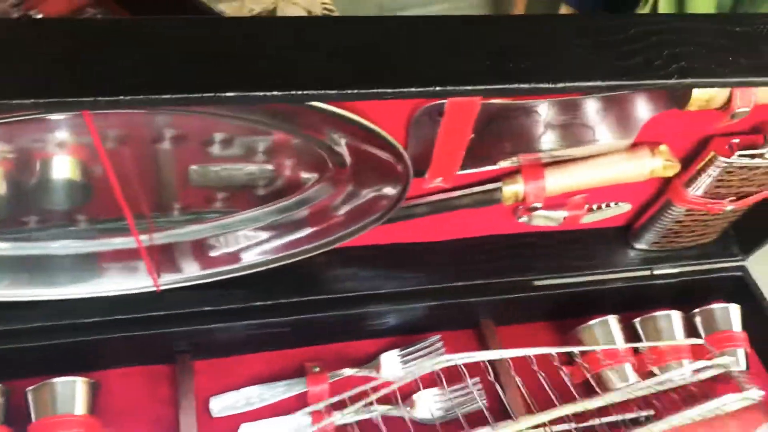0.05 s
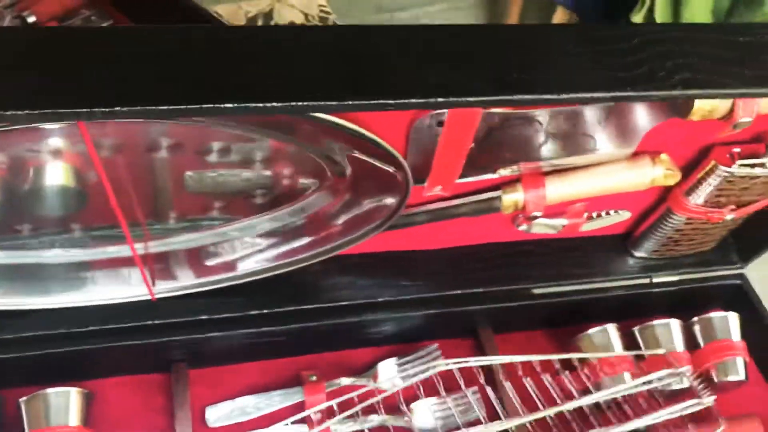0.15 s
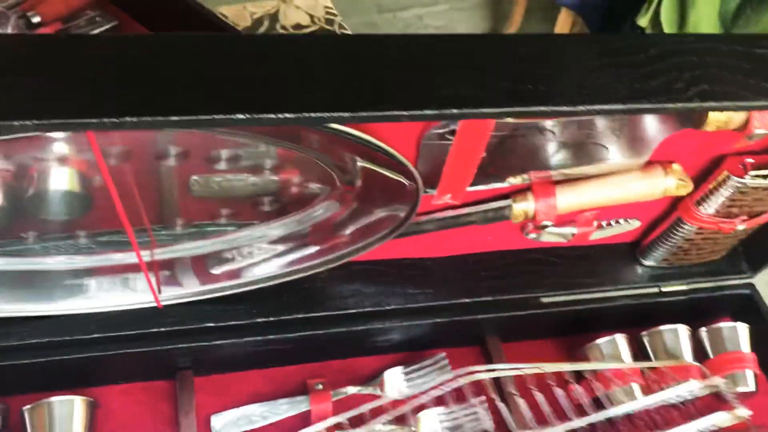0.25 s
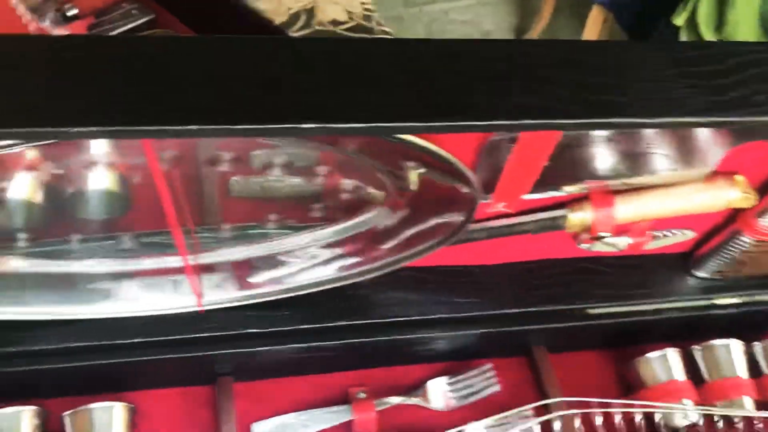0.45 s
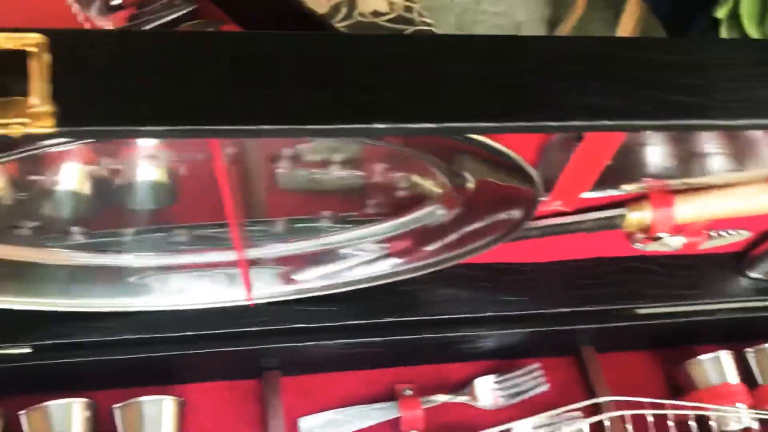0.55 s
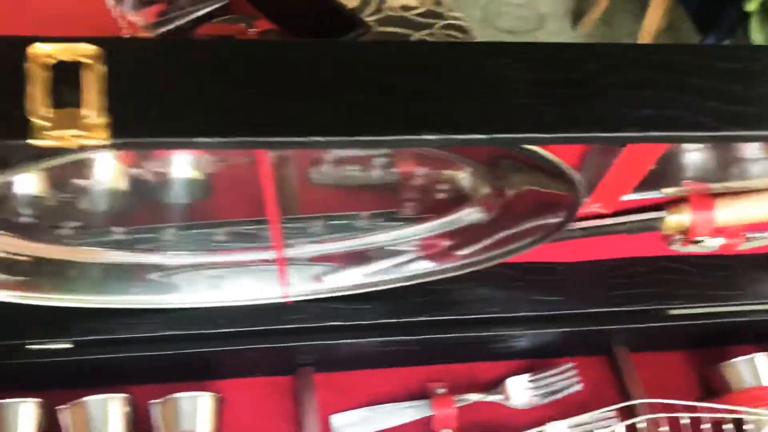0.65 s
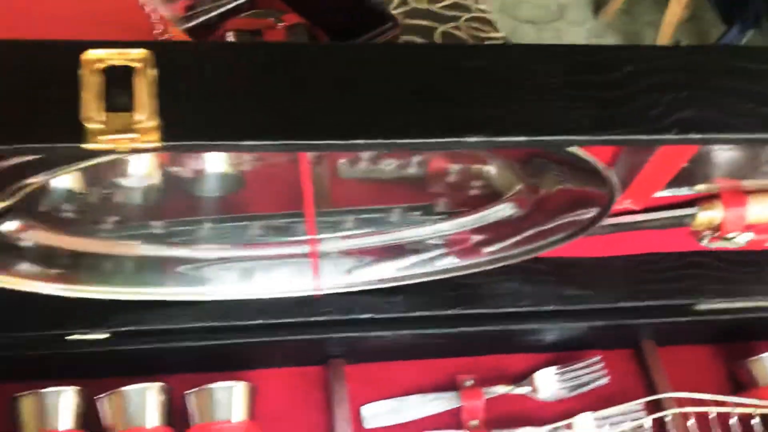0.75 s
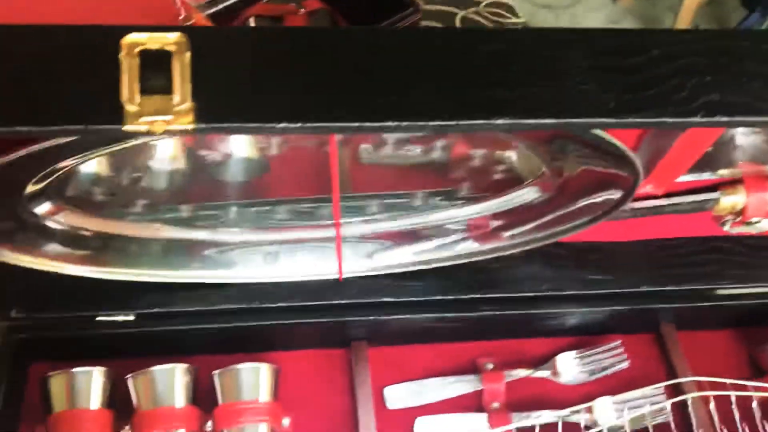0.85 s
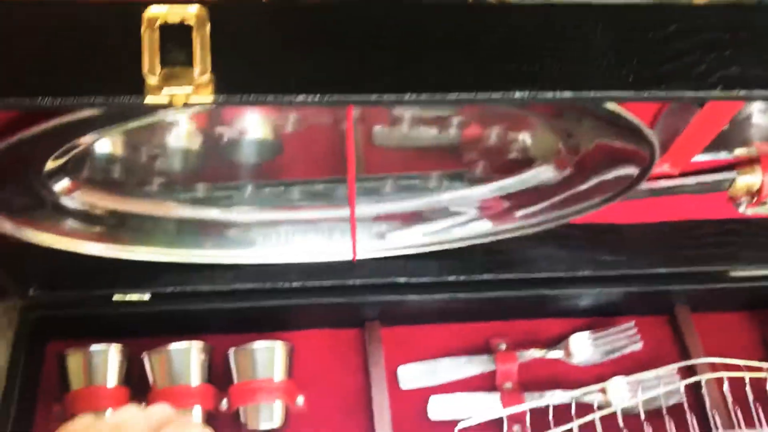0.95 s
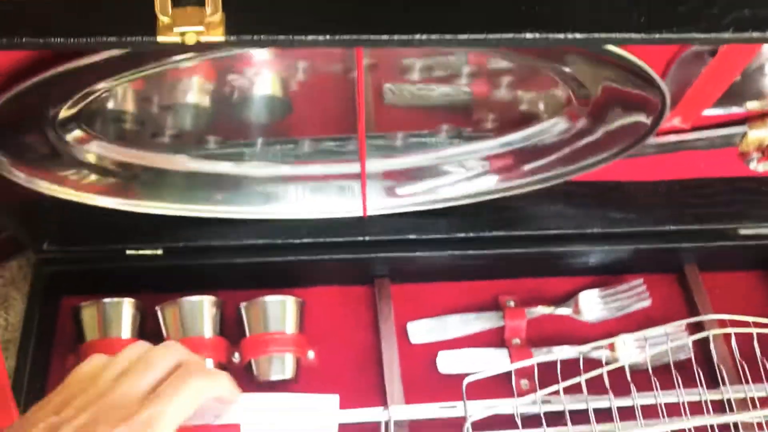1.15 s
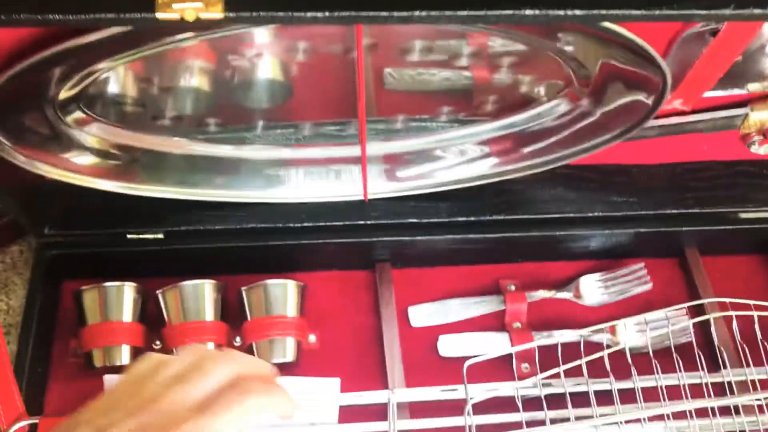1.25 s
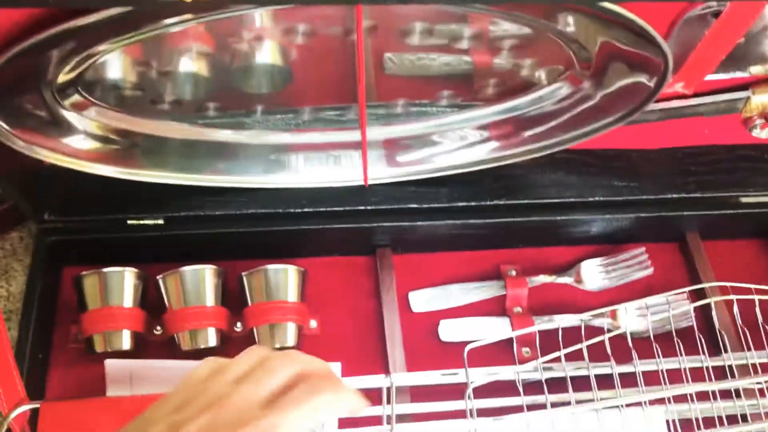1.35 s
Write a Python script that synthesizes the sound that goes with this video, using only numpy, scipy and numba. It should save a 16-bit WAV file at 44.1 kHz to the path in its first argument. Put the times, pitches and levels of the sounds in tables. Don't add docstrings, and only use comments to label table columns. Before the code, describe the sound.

A steel wire grill clatters down twice onto cutlery in a wooden case, ringing brightly.

```python
import sys
import numpy as np
from scipy import signal
from scipy.fft import rfft, irfft
from scipy.io import wavfile
from scipy.ndimage import uniform_filter1d
from numba import njit

SR = 44100
rng = np.random.default_rng(int(sys.argv[2]) if len(sys.argv) > 2 else 0)


def materialize(psi):
    bounded = np.clip(np.atleast_2d(psi).T, -1, 1)
    quanta = np.round(bounded * 32767).astype(np.int16)
    wavfile.write(sys.argv[1], SR, quanta)


def nominal_scale(level):
    x = np.asarray(level, float) / 20
    return 10 ** x


N = 61739


@njit
def ring(x, hz, t60, gain):
    y = np.zeros(len(x))
    on = np.nonzero(np.abs(x) > 1e-3 * np.abs(x).max())[0]
    for k in range(len(hz)):
        pole = np.exp(2j * np.pi * hz[k] / SR - np.log(1000) / (t60[k] * SR))
        z = 0j
        for i in range(on[0], min(len(x), on[-1] + int(1.1 * t60[k] * SR))):
            z = z * pole + x[i]
            y[i] += gain[k] * z.imag
    return y


def at(table, hz):
    f, value = np.array(table).T
    return np.interp(np.log(hz), np.log(f), value)


def colour(x, table):
    hz = np.maximum(np.arange(N // 2 + 1) * SR / N, 1)
    y = irfft(rfft(x) * nominal_scale(at(table, hz)), N)
    return y / np.std(y)


def walk(rate):
    hold = int(SR / rate)
    steps = np.repeat(rng.standard_normal(N // hold + 1), hold)
    w = uniform_filter1d(uniform_filter1d(steps, hold), hold)[:N]
    return w / np.std(w)


def strike(blows, modes, soft_s):
    t = np.arange(N) / SR
    push = np.zeros(N)
    for s, db in blows:
        push += nominal_scale(db) * np.sin(np.pi * np.clip((t - s) / soft_s, 0, 1))
    hz, db, t60 = np.array(modes, float).T.copy()
    return ring(push / max(soft_s * SR * 2 / np.pi, 1), hz, t60, nominal_scale(db))


def chatter(contacts, grain_db):
    t = np.arange(N) / SR
    clicks = rng.choice([-1., 1.], N) * nominal_scale(grain_db * np.minimum(rng.exponential(size=N), 4))
    decay = sum(nominal_scale(db - 60 * np.maximum(t - s, 0) / t60) * (t >= s) for s, db, t60 in contacts)
    return clicks / np.std(clicks) * decay


def wires(drive, tone, dry_db, longer, count):
    # f/Hz, t60/s
    wire_t60 = [(500, 0.03), (2000, 0.15), (6000, 0.23), (16000, 0.13)]
    scatter = rng.random((count, 3)).T
    hz = 500 + 15100 * ((np.arange(count) + scatter[0]) / count) ** 1.3
    t60 = longer * at(wire_t60, hz) * (0.76 + .5 * scatter[1])
    gain = nominal_scale(at(tone, hz) + 2 * scatter[2]) * rng.choice([-1., 1.], count)
    rung = 0.033 * ring(drive, hz, t60, gain)
    return rung + nominal_scale(dry_db) * colour(drive, tone) * np.std(drive)


def strong(drive, hzs, from_s, until_s, modes):
    t = np.arange(N) / SR
    mute_db_s = 500
    out = np.zeros(N)
    for hz, start, end, (db, t60) in zip(hzs, from_s, until_s, modes):
        split_hz = hz + np.array([-12., 1., 17.])
        gain = nominal_scale(db + np.array([-3., 0., -4.]))
        rung = ring(drive * (t > start), split_hz, np.full(3, t60), gain)
        out += rung * nominal_scale(-mute_db_s * np.maximum(t - end, 0))
    return out


def first_landing():
    # t/s, level/dB, chatter t60/s
    first_contacts = [(.2462, -28.5, 0.011), (.2512, -25, 0.0091), (.262, -40.5, 0.035),
                      (.2882, -35.5, 0.082), (.3265, -40, 0.069), (.365, -44.5, 0.082),
                      (.412, -42.5, 0.016)]
    # f/Hz, level/dB
    first_tone = [(470, -55), (800, -30.5), (1220, -12), (1380, -22), (1750, -8.5), (2940, -19),
                  (3680, -11.5), (7640, -17.5), (15500, -10.5)]
    # (level/dB, t60/s)
    first_hz = [1535, 1795, 1955, 2132, 3397, 3720, 5400, 6530, 11028, 11232, 14893, 15266]
    first_from_s = [.25, .32, .25, .28, .28, .25, .2, .28, .28, .28, .25, .25]
    first_until_s = [.47, .49, .42, .4, .4, .45, .47, .47, .36, .35, .35, .405]
    first_modes = [(-1, .3), (7, .5), (-1, .35), (-6, .4), (1, .22), (-2, .22), (-7, .2), (-6, .25),
                   (-6, .25), (5, .16), (-8, .2), (4, .35)]
    drive = chatter(first_contacts, grain_db=3.5)
    dense = wires(drive, first_tone, dry_db=2.5, longer=1.29, count=440)
    return dense + nominal_scale(-35.5) * strong(drive, first_hz, first_from_s, first_until_s, first_modes)


def second_landing():
    # t/s, level/dB, chatter t60/s
    second_contacts = [(.4787, -28, 0.022), (.486, -31.5, 0.073), (.5015, -28, 0.022), (.524, -29, 0.017),
                       (.5358, -32.5, 0.075), (.558, -39, 0.11), (.582, -48.5, 0.092)]
    # f/Hz, level/dB
    second_tone = [(350, -44), (600, -22), (860, -27), (1100, -13), (1620, -10), (2250, -10.5), (4310, -14),
                   (5220, -17), (6760, -14), (15500, -15)]
    # (level/dB, t60/s)
    second_hz = [2048, 2255, 2537, 3311, 3470, 3755, 4255, 4457, 4840, 6704, 7290, 9275, 11320, 14000]
    second_from_s = [.47, .47, .53, .53, .57, .47, .53, .53, .53, .53, .57, .47, .53, .57]
    second_until_s = [.54, .56, .62, .56, .7, .515, .56, .58, .6, .74, .8, .7, .7, .7]
    second_modes = [(-5, .06), (-11, .2), (-5, .25), (-3, .08), (2, .25), (3, .06), (0, .1), (-1, .1),
                    (-5, .12), (-1, .3), (-9, .29), (-10, .18), (-4, .27), (-7, .35)]
    drive = chatter(second_contacts, grain_db=3.5)
    dense = wires(drive, second_tone, dry_db=-11.0, longer=0.48, count=520)
    return dense + nominal_scale(-32.5) * strong(drive, second_hz, second_from_s, second_until_s, second_modes)


def light_touches():
    # t/s, level/dB, chatter t60/s
    light_contacts = [(.026, -55, 0.024), (.0383, -53.5, 0.094), (.07, -64.5, 0.2), (.216, -67, 0.082),
                      (.226, -58.5, 0.16), (.696, -55, 0.023), (.706, -83, 0.0075), (.757, -63, 0.011),
                      (.795, -57, 0.047), (.820, -53.5, 0.018), (.865, -58.5, 0.03), (.985, -60, 0.024),
                      (1.04, -71, .02), (1.1, -66, 0.035)]
    # f/Hz, level/dB
    light_tone = [(880, -36), (1500, -16), (2060, 4), (2830, -32), (3500, 1.5), (5000, -7.5), (6690, -9),
                  (16000, -14.5)]
    drive = chatter(light_contacts, grain_db=5.0)
    return wires(drive, light_tone, dry_db=-4.0, longer=0.24, count=150)


def case_thumps():
    # t/s, peak level/dB
    first_blows = [
        (.2452, -25),
        (.2555, -36.5),
        (.268, -28),
    ]
    second_blows = [(.4795, -37), (.4868, -32), (.4925, -38.5), (.4995, -31), (.543, -40), (.552, -38),
                    (.575, -41.5), (.61, -45), (.703, -50)]
    # f/Hz, level/dB, t60/s
    first_panel = [(208.6, -8.5, 0.11), (327.2, -8.5, 0.16), (520, -2, 0.017), (627, -3.5, 0.045),
                   (828, -10.5, 0.041)]
    second_panel = [(93, 2, 0.048), (187.8, -7, 0.21), (249.5, -12.5, .15), (316, -2.5, 0.049),
                    (488, -10.5, 0.084), (619, -7.5, 0.066), (677, 2, 0.039), (787, -2, .04),
                    (986, -5, 0.078), (1145, -2.5, 0.04), (1357, -6, 0.042), (1880, -5, 0.044)]
    return strike(first_blows, first_panel, 0.00039) + strike(second_blows, second_panel, 0.00053)


def lid_knock():
    # t/s, peak level/dB
    lid_blows = [
        (0.2493, -26),
        (.305, -46),
    ]
    # f/Hz, level/dB, t60/s
    lid_modes = [(115.8, 3, 0.15), (128, -20, 0.46)]
    return strike(lid_blows, lid_modes, 0.004)


def clinks():
    # t/s, peak level/dB
    clink_blows = [
        (0.2521, -24.5),
        (0.2896, -31),
        (0.4097, -43.5),
    ]
    # f/Hz, level/dB, t60/s
    clink_modes = [(4550, 2, 0.026), (4615, -7.5, 0.024), (5230, -3, 0.012), (5380, -2.5, 0.01),
                   (5600, -22, 0.014), (14300, -3, 0.0157)]
    return strike(clink_blows, clink_modes, .00005)


def snaps():
    # t/s, peak level/dB, brightness f/Hz
    snap_events = [(.2882, -38, 5000), (.3261, -31, 11000), (.4099, -41, 3800), (.4862, -26, 3600),
                   (.4924, -28, 2500), (.502, -30, 2200), (.5245, -33, 3000), (.5362, -29, 4200),
                   (.5412, -33, 3300), (.5535, -34, 4500), (.569, -34, 4800), (.585, -36, 3500),
                   (.7557, -48, 3000), (.795, -52, 5000), (.8205, -47, 5000), (.826, -52, 4000),
                   (.8605, -54, 3500), (.884, -55, 4000), (.9587, -57, 3200), (.9692, -57, 3000),
                   (1.037, -54, 11000), (1.0734, -57, 4000), (1.105, -57, 2500)]
    t = np.arange(N) / SR
    out = np.zeros(N)
    for s, db, hz in snap_events:
        since = np.maximum(t - s, 0)
        t60 = 9 / hz
        out += nominal_scale(db - 60 * since / t60) * np.sin(2 * np.pi * hz * since)
    return out


def ticks():
    tick_s = [.083, .6677, .6688, .697, .706, .757, .822]
    tick_db = [-73, -65, -28.5, -48, -41, -48.5, -52]
    # f/Hz, level/dB, t60/s
    tick_modes = [(975, -5.5, 0.011), (1880, -1, 0.021), (2840, 9.5, 0.0027), (3180, 0, 0.0066),
                  (4300, -2, 0.009), (5160, -13, 0.0047)]
    return np.gradient(strike(list(zip(tick_s, tick_db)), tick_modes, 0.00024)) * 2.7


def cup():
    tap_s = [.727, .795, .863, .95, 1.03]
    tap_db = [-53, -58, -56, -61, -63]
    # f/Hz, level/dB, t60/s
    cup_modes = [(900, -9, .2), (1350, -9, .2), (1520, -6, .12), (1612, -6, .16), (2098, -3, .35),
                 (2078, -9, .25), (2350, -15, .2), (3375, -16, .1), (7289, -19, .12)]
    return strike(list(zip(tap_s, tap_db)), cup_modes, .0001)


def slide():
    # t/s, level/dB
    slide_course = [(0, -61.5), (.1, -70), (.2, -82), (0.597, -45), (0.749, -58), (.86, -64), (.905, -76.5),
                    (.97, -63), (1.01, -67.5), (1.089, -63.5), (1.15, -69), (1.179, -76), (1.4, -74.5)]
    # f/Hz, level/dB
    slide_tone = [(590, -43), (1000, -6.5), (2030, -3), (2620, -2.5), (3190, 2), (3840, -2.5),
                  (12700, -11.5), (16000, -14)]
    # f/Hz, level/dB, t60/s, middle t/s, length/s
    slide_bands = [(3460, 4.5, 0.015, 0.071, 0.058), (6900, -8, .015, 0.72, 0.053),
                   (7300, -4.5, .02, 0.78, 0.11), (2570, 1, 0.0077, 0.76, .08),
                   (4930, 1, 0.0056, 0.807, 0.041), (6470, 5, 0.0062, .82, 0.062),
                   (4230, -5, 0.0058, 0.41, 0.019), (3200, 3, 0.0041, .975, 0.066),
                   (8600, 1, .006, .98, 0.088), (6160, 2, 0.0052, .985, 0.036),
                   (2360, 2, 0.0077, 1.08, 0.047), (3350, -1, .007, 0.97, 0.027),
                   (4460, 1, .005, 1.095, 0.021), (6600, 4, 0.0077, 1.113, 0.064),
                   (13000, 10, .004, 1.106, 0.12)]
    t = np.arange(N) / SR
    rough = rng.standard_normal(N) * nominal_scale(0.89 * np.minimum(rng.exponential(size=N), 4))
    grains = colour(rough, slide_tone)
    rung = np.zeros(N)
    for hz, db, t60, middle, length in slide_bands:
        rub = grains * np.exp(-(2 * (t - middle) / length) ** 2)
        rung += ring(rub, np.array([1. * hz]), np.array([t60]), nominal_scale(np.array([db])))
    s, db = np.array(slide_course).T
    return (grains + 0.077 * rung) * nominal_scale(np.interp(t, s, db) + walk(30.5))


def room_tail(near):
    t = np.arange(SR // 2) / SR
    t60_s, level_db = 0.55, -13
    tail = rng.standard_normal(len(t)) * nominal_scale(-60 * t / t60_s) * (t > .003)
    wet = signal.fftconvolve(near, tail / np.sqrt(np.sum(tail ** 2)))[:N]
    return nominal_scale(level_db) * wet


def air():
    # f/Hz, level/dB per Hz
    air_tone = [(15, -6), (50, -1), (160, -7.5), (330, -18), (1200, -25.5), (2500, -37.5), (6000, -43.5),
                (16000, -43.5)]
    level_db, fade_db_s = -57, -1
    fade = fade_db_s * (np.arange(N) / SR - 2.5)
    return colour(rng.standard_normal(N), air_tone) * nominal_scale(level_db + fade + .5 * walk(5.53))


def scene():
    near = first_landing() + second_landing() + light_touches()
    near = near + case_thumps() + lid_knock() + clinks() + snaps()
    near = near + ticks() + cup() + slide()
    return (near + room_tail(near) + air())[None]


def band_limit(x):
    return signal.sosfilt(signal.butter(12, 16810, fs=SR, output="sos"), x)


def record(dry):
    # f/Hz, level/dB
    port_tone = [(6500, 0), (7700, -2), (8600, -0.5), (10300, -3.5), (11300, -1), (13000, -0.5),
                 (15500, -1)]
    hz = np.linspace(0, SR / 2, 257)
    port = signal.firwin2(255, hz, nominal_scale(2 * at(port_tone, np.maximum(hz, 1))), fs=SR)
    port = signal.minimum_phase(port)
    low_cut = signal.butter(2, 51.6, "high", fs=SR, output="sos")
    top_cut = signal.ellip(8, .2, 42, 15750, fs=SR, output="sos")
    mix = signal.sosfilt(np.vstack([low_cut, top_cut]), signal.lfilter(port, [1], dry))
    return band_limit(mix)


dry = scene()
out = record(dry)
materialize(out)
```